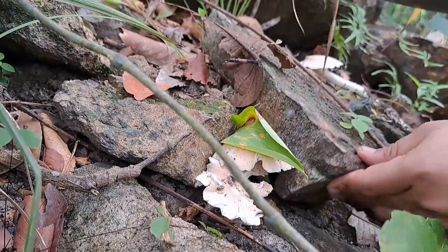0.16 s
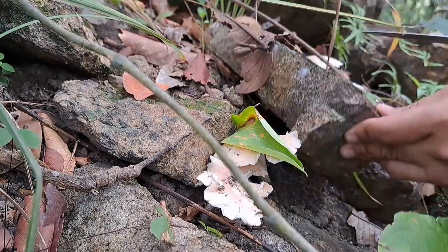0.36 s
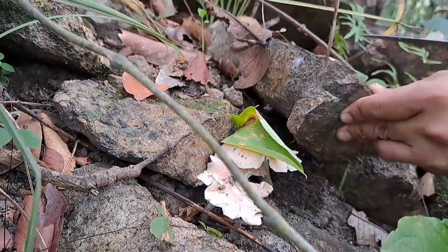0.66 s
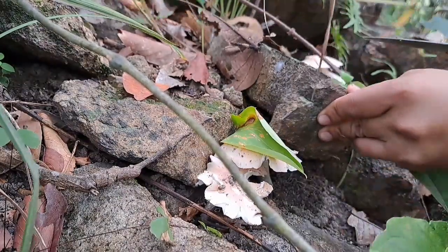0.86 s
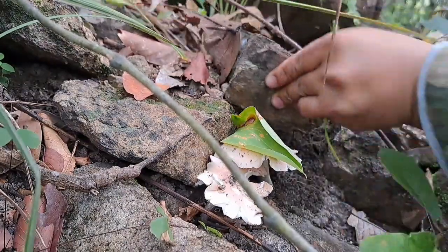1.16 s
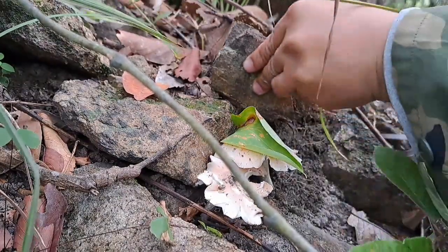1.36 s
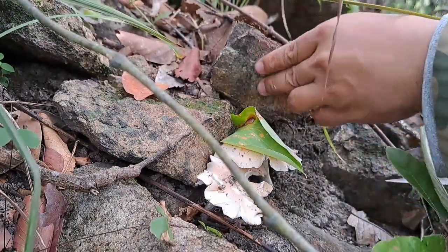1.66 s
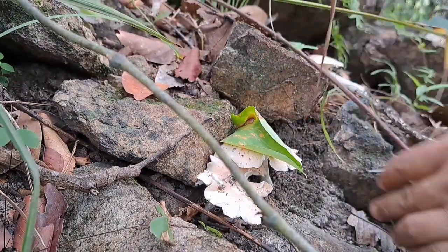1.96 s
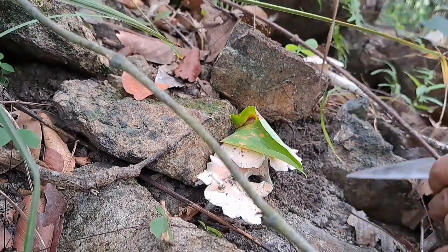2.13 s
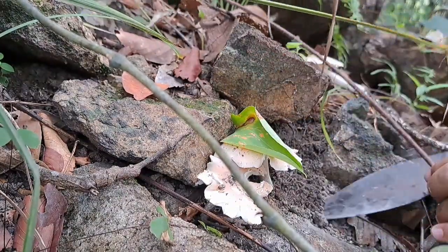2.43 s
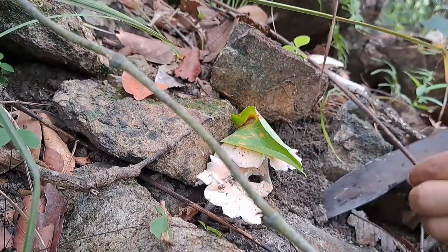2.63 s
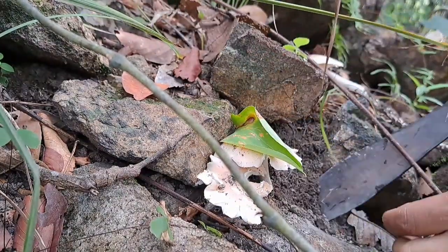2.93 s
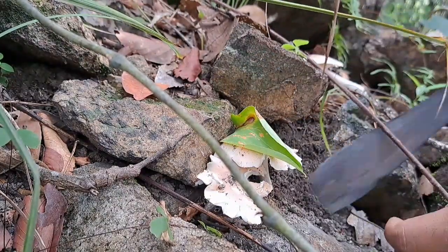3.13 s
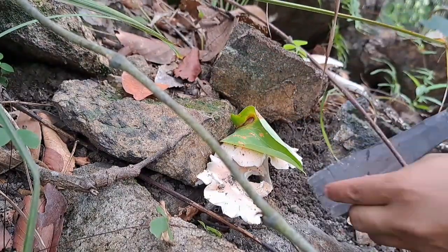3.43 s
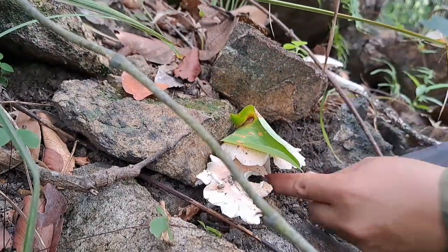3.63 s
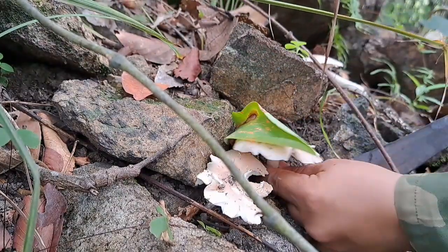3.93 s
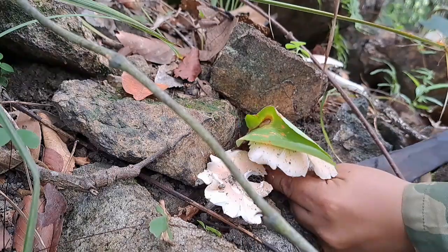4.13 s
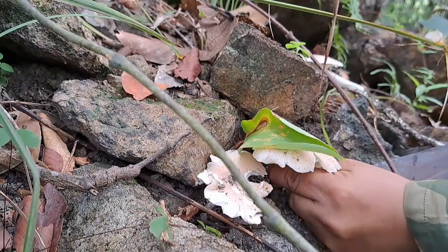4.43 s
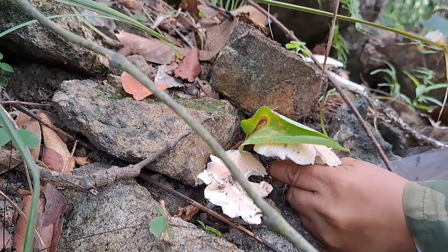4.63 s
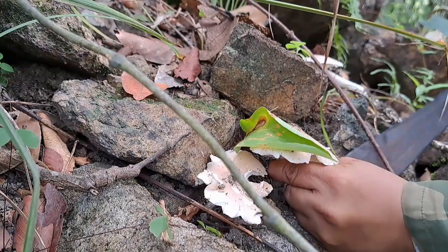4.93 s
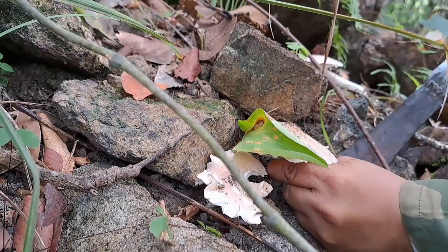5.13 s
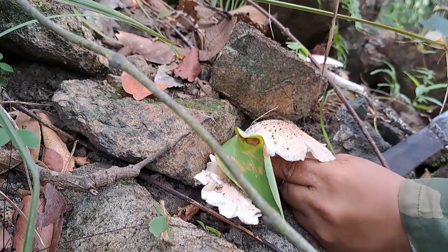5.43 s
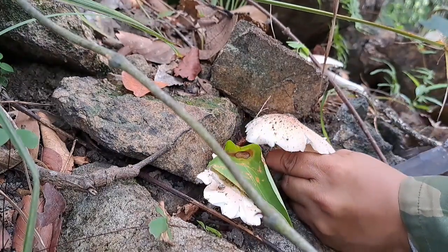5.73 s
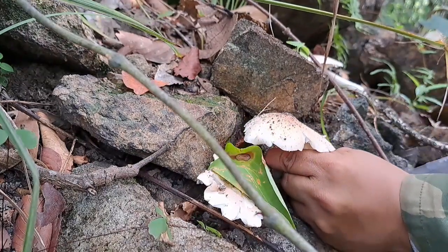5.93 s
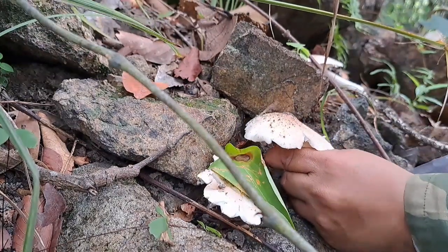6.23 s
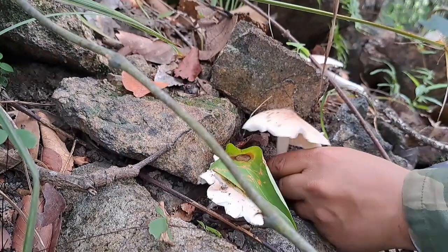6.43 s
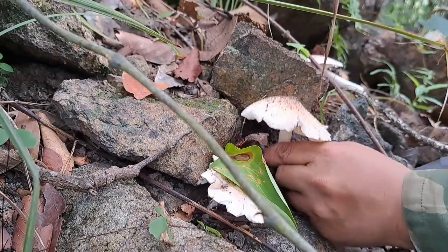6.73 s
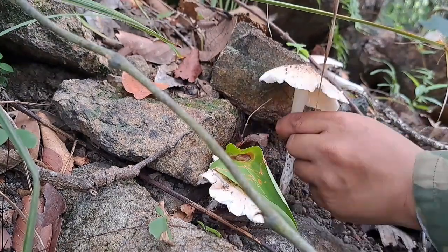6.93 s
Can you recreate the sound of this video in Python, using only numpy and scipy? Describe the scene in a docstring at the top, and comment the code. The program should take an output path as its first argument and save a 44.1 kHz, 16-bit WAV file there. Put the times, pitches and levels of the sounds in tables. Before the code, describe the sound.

A hand turns a stone over with faint gritty scrapes and a few low, hollow thuds. Then a long knife digs into stony soil in short, crackling strokes, with sharp clicks and brief steel ringing. The work eases into softer rustles of grit and leaves and a dull thud, before a last cluster of snaps as a mushroom is lifted. Everything is close and slightly right, in nearly silent woods.

```python
"""Digging in stony soil

Hands turn a stone over, then a long knife digs in forest soil close to the right of a phone.
Slipping grit and leaves rustle, and cracking grains click and make the steel blade ring.
The stone and the loose ground thud low when pushed. The woods behind are nearly silent."""
import sys
import numpy as np
from scipy import signal
from scipy.fft import rfft, irfft, next_fast_len
from scipy.io import wavfile
from scipy.ndimage import uniform_filter1d, map_coordinates

SR = 44100
rng = np.random.default_rng(int(sys.argv[2]) if len(sys.argv) > 2 else 0)


def persist_wave(psi):
    """Save psi, clipped to +-1, as 16-bit WAV."""
    counts = np.round(np.clip(psi, -1, 1) * 32767).astype(np.int16)
    wavfile.write(sys.argv[1], SR, np.atleast_2d(counts).T)


N = 312669

# Single grains and dry leaves cracking. Each row: start in seconds, treble level in dB, contact. Contact says
# what is touched: about -1 is soft soil, 0 is dry grit, 1 is bare steel.
CRACKS = [(.254, -51, 0.097), (.268, -51, .2), (.694, -56, .3), (0.605, -49.5, -0.15), (1.164, -47, 0.57),
          (1.194, -42, 0.35), (1.216, -35.5, -0.5), (1.29, -35, -0.47), (2.083, -27, -0.068),
          (2.106, -42, -0.98), (2.652, -27, -0.13), (2.771, -21.5, 0.6), (2.812, -30, 0.74),
          (2.852, -12, -0.15), (2.892, -17, 0.53), (2.993, -28, 0.51), (3.006, -29.5, 0.064),
          (3.073, -23.5, 0.82), (3.081, -30, 0.82), (3.107, -15, 0.86), (3.279, -32.5, -0.16),
          (3.322, -32.5, 0.44), (3.354, -35, -0.41), (3.43, -37.5, 0.0034), (3.504, -34, -0.24),
          (3.559, -15.5, 0.32), (3.953, -26.5, 0.34), (4.088, -25, 0.9), (4.113, -23, 0.67),
          (4.137, -33, 0.25), (4.147, -30, 0.095), (4.185, -39, 0.68), (4.273, -44, 0.1),
          (4.858, -33, -0.27), (4.892, -26, 0.023), (5.083, -22.5, -0.066), (5.186, -41, 0.79),
          (5.366, -41, .1), (5.401, -36.5, 0.011), (5.435, -49, .1), (5.508, -48, 0.7), (5.578, -53.5, 1),
          (5.839, -42.5, -0.075), (5.905, -42, -0.25), (5.94, -38, 0.082), (6.116, -44.5, -1.15),
          (6.144, -45.5, -0.28), (6.296, -46, 0.15), (6.349, -42.5, 0.34), (6.392, -51.5, -1.01),
          (6.419, -49.5, -0.44), (6.624, -45.5, -0.88), (6.653, -18.5, 0.11), (6.675, -24.5, 0.071),
          (6.736, -50, -1.1), (6.825, -20, -0.51), (6.864, -37, -0.3), (6.951, -35, 0.61),
          (7.003, -32, 0.57)]
STONE_TIPS_S, KNIFE_ARRIVES_S = 0.83, 1.9


def undb(db):
    """Turn decibels into a gain."""
    return 10 ** (np.asarray(db) / 20)


def unit(x):
    """Scale a sound to an average power of 1."""
    return x / np.sqrt(np.mean(x ** 2))


def curve(points):
    """Join (seconds, value) points with straight lines."""
    return np.interp(np.arange(N) / SR, *np.transpose(points))


def wander(rate):
    """Glide to a new random value `rate` times a second."""
    step = int(SR / rate)
    held = np.repeat(rng.standard_normal(N // step + 1), step)
    return unit(uniform_filter1d(held, step)[:N])


def colour(x, points):
    """Filter a sound to follow (Hz, dB) points."""
    size = 4096
    hz, db = np.transpose(points)
    freqs = np.arange(size // 2 + 1) * SR / size
    cepstrum = irfft(np.interp(np.log(freqs + 1), np.log(hz), db) * np.log(10) / 20)
    cepstrum[1:size // 2] *= 2  # folded so that nothing sounds before its cause
    cepstrum[size // 2 + 1:] = 0
    return signal.fftconvolve(x, irfft(np.exp(rfft(cepstrum))))[:N]


def ring(x, hz, t60):
    """One ringing tone that fades 60 dB in t60 seconds."""
    decay, angle = np.exp(-np.log(1000) / (t60 * SR)), 2 * np.pi * hz / SR
    return signal.lfilter([np.sin(angle)], [1, -2 * decay * np.cos(angle), decay ** 2], x)


def played(tone, x, gain):
    """Shake the filter `tone` with x, as loudly as `gain` says."""
    return tone(x * gain) / np.sqrt(np.mean(tone(x) ** 2))


def quiet_woods():
    """Faint air and microphone hiss, different in each ear."""
    # Each row: frequency in Hz, relative level in dB.
    air_tone = [(15, -40), (25, -11), (154, -2), (399, -24.5), (3510, -28), (7920, -17), (15200, -24.5),
                (16500, -44)]
    return unit(np.array([colour(rng.standard_normal(N), air_tone) for _ in range(2)])) * undb(-71)


def grains(rate, spread_db, fill):
    """Slipping grit: clicks of very uneven size over a hiss of fine sand."""
    hit = rng.random(N) < rate / SR
    size = undb(spread_db * np.minimum(rng.exponential(size=N), 4.0)) * rng.standard_normal(N)
    return unit(unit(hit * size) + fill * rng.standard_normal(N))


def patchy(x, drift):
    """Grain sizes keep changing, so each frequency band swells and sinks on its own."""
    size = next_fast_len(N)
    spectrum = rfft(x, size)
    edges = np.geomspace(300, SR / 2, len(drift) + 1)
    hz = np.arange(len(spectrum)) * SR / size
    bands = (irfft(spectrum * (hz >= lo) * (hz < hi), size)[:N] for lo, hi in zip(edges, edges[1:]))
    return unit(sum(band * gain for band, gain in zip(bands, drift)))


def strokes_and_cracks():
    """Loudness of grit, soil and steel over time: soft contact sounds the soil, hard contact the steel."""
    # Loose soil trickling. Each row: time in seconds, treble level in dB.
    trickle = [(0, -59.5), (.2, -76.5), (1.4, -96), (1.5, -75), (1.8, -82.5), (2.05, -55.5), (2.5, -78.5),
               (2.72, -59.5), (3.45, -69), (3.9, -71), (4.3, -63.5), (4.65, -82.5), (5.2, -57), (5.83, -97),
               (6.05, -70), (6.58, -73.5), (6.72, -51), (7.09, -58)]
    # Strokes of hand, stone and blade. Each row: start and length in seconds, treble level in dB,
    # contact, build (0 strikes and dies away, 1 swells and stops dead).
    strokes = [(0.249, 0.081, -52, -0.28, 0.28), (0.409, 0.097, -54, -0.072, 0.33),
               (0.694, 0.17, -48.5, -0.5, 0.44), (0.994, 0.209, -44, 0.22, 0.77),
               (1.194, .07, -42, -0.0079, 0.21), (1.274, 0.11, -49.5, -0.5, 0.65),
               (2.08, 0.029, -44, -0.37, 0.079), (2.149, 0.074, -56, -0.2, 0.12),
               (2.303, 0.094, -52.5, 0.46, 0.43), (2.559, 0.047, -33.5, 0.71, 0.39),
               (2.629, 0.02, -33.5, -0.38, 0.24), (2.763, 0.055, -34, 0.61, 0.62),
               (2.85, 0.043, -21, -0.051, 0.24), (2.882, 0.02, -26, .3, .2),
               (2.956, 0.088, -42, 0.12, 0.18), (3.069, 0.061, -39.5, 1.24, .15),
               (3.106, 0.012, -28.5, 1.05, 0.046), (3.173, 0.029, -15, 0.46, 0.43),
               (3.203, 0.035, -27, -0.014, 0.57), (3.307, 0.12, -41, 0.29, 0.59),
               (3.522, 0.059, -35, 0.16, 1), (3.576, .11, -42, -0.074, 0.15),
               (3.761, 0.064, -41.5, 0.37, 0.047), (3.94, 0.025, -42, 0.89, 0.59),
               (4.077, 0.085, -41, 0.75, 0.36), (4.174, 0.051, -51, 0.56, .1),
               (4.23, 0.16, -58.5, 0.8, 0.12), (4.832, 0.056, -36.5, 0.89, 0.66),
               (4.947, 0.088, -40, 0.85, 0.76), (5.079, 0.048, -30, 0.16, 0.44),
               (5.3, 0.04, -29.5, -0.059, 0.42), (5.37, .1, -49, 0.23, 0.24), (5.506, 0.36, -55, .05, 0.59),
               (5.683, 0.091, -52.5, -1.01, 0.9), (5.896, 0.067, -45.5, -0.83, 0.61),
               (6.252, 0.068, -47.5, -0.18, 0.2), (6.379, 0.083, -57, -0.76, 0.2),
               (6.652, 0.032, -35, -0.38, 0.32), (6.766, 0.032, -27.5, 0.43, 0.32),
               (6.821, .022, -21.5, -0.16, 0.41), (6.85, 0.03, -42.5, -0.55, 0.2),
               (6.965, 0.04, -41, 0.96, 0.24)]
    t = np.arange(N) / SR
    power = undb(curve(trickle) + 2.0 * wander(23) + np.array([[0], [-9], [-20]])) ** 2
    uneven_db = 2.0 * wander(90)
    for start, length, db, contact, build in strokes:
        rise, fall = 0.87 * length * np.clip([build, 1 - build], .03, 1)  # seconds per 12 dB
        span = slice(max(int((start - 3 * rise) * SR), 0), int((start + length + 3 * fall) * SR))
        early = np.maximum((start - t[span]) / rise + .5, 0)
        late = np.maximum((t[span] - start - length) / fall + .5, 0)
        levels = db + np.array([[0], [-9.5 - 13 * contact], [-16 + 20 * contact]])
        power[:, span] += undb(levels - 12 * (early + late) + uneven_db[span]) ** 2
    age = t[:SR // 20]
    crack = (1 - np.exp(-age / 0.00054)) * undb(-60 * age / 0.021)
    for start, db, contact in CRACKS:
        i = int(start * SR)
        levels = db + np.array([[0], [-13 - 26 * contact], [-15 + 22.5 * contact]])
        power[:, i:i + len(age)] += (crack / crack.max() * undb(levels)) ** 2
    # small grains crack at random on top of whatever moves
    ticks = (rng.random(N) < 80 / SR) * undb(11 + 3.5 * rng.standard_normal(N)) ** 2
    power[0] += np.minimum(power[0], undb(-52) ** 2) * signal.fftconvolve(ticks, crack ** 4)[:N]
    # what the blade takes up is not heard as dry crackle
    power[0] *= power[0] / (power[0] + power[2])
    return np.sqrt(np.abs(power))


def stone_ring(x):
    """The dragged stone rings hollow."""
    # Each row: pitch in Hz, level in dB, ring time in seconds.
    stone_tones = [(480, 0, .05), (3230, -5, .025), (5700, -5, .018)]
    return sum(undb(db) * ring(x, hz, t60) for hz, db, t60 in stone_tones)


def ground_rumble(shake):
    """The loose ground answers every push with a low rumble."""
    band = signal.butter(2, [46, 78], "bandpass", fs=SR, output="sos")
    push = uniform_filter1d(shake, 1500) ** 0.62 + undb(-63.0)
    return played(lambda x: signal.sosfilt(band, x), rng.standard_normal(N), undb(-29) * push)


def rocking_thuds():
    """A rough push rocks the stone unevenly; its pitch sags and two hollow overtones knock along."""
    # Each row: start in seconds, level in dB, length of the push in seconds.
    pushes = [(0.721, -39, 0.022), (0.744, -28, 0.03), (.8, -45, 0.081), (.86, -38.5, 0.019),
              (0.907, -35, 0.0051), (1.223, -37.5, 0.048), (1.318, -37, 0.082), (3.18, -47, 0.009),
              (3.95, -41.5, 0.01), (4.895, -44, 0.018), (5.335, -42.5, 0.022), (5.698, -25, 0.022),
              (6.82, -46, 0.029)]
    rock_hz, sag_per_s, ring_s = 143.4, 1.45, 0.12
    out = np.zeros(N)
    t = np.arange(SR // 4) / SR
    wobble, rough = wander(70), wander(110)
    for (start, db, length), phase in zip(pushes, rng.random((len(pushes), 3))):
        span = slice(int(start * SR), int(start * SR) + len(t))
        fade = np.minimum(t / 0.0056, 1) * undb(db - 60 * np.maximum(t - length, 0) / ring_s)
        cycles = np.cumsum(rock_hz * (1 - sag_per_s * t + 0.083 * wobble[span])) / SR
        rock = undb(3.3 * rough[span]) * np.sin(2 * np.pi * (cycles + phase[0]))
        knock = undb(-4) * np.sin(2 * np.pi * (250 * t + phase[1]))
        knock += undb(-8) * np.sin(2 * np.pi * (450 * t + phase[2]))
        out[span] += fade * (rock + knock * undb(3.7 * wobble[span] - 380 * t))
    return out


def blade_ring(x, shift):
    """Moving contact feeds the steel's tones unevenly; soil around it shortens them and alters their mix."""
    # Each row: pitch in Hz, level in dB, change in dB when buried, free ring time in seconds.
    steel_tones = [(1034, -11, -8, 0.045), (1670, -5, -4, 0.03), (2890, -1, 3, .045), (3863, -5, -3, .04),
                   (4340, 0, 1, 0.035), (4980, 2, -5, 0.03), (5400, -2, -3, 0.025), (6180, -6, 0, .035),
                   (7220, -9, 6, .045), (7600, -3, -4, 0.045), (7860, -7, 4, 0.045), (8650, -6, -1, .035),
                   (10900, -4, -1, 0.03), (12700, -8, 6, 0.035), (13410, 1, -12, 0.09), (15000, -7, 2, .04)]
    # Contact near the thin tip favours high tones. Each row: time in seconds, tilt in dB per octave.
    tip_contact = [(2.65, 3), (2.8, 0), (6.85, 0), (6.95, 2.5)]
    t = np.arange(N) / SR
    buried = (t > 3.35) & (t < 6.9)
    tilt = curve(tip_contact)
    out = np.zeros(N)
    for k, (hz, db, buried_db, t60) in enumerate(steel_tones):
        gain = undb(db + tilt * np.log2(hz / 4000)) * np.roll(shift, k * N // len(steel_tones))
        push = (-1) ** k * gain * x
        out += ring(push * ~buried, hz, t60)
        out += ring(push * buried * undb(buried_db), hz, t60 * 0.82)
    return out


def digging(apart):
    """Grit crackles and rings the blade, clods sound the soil; `apart` is the far side's own grit share."""
    # The tone of grit and of soil. Each row: frequency in Hz, relative level in dB.
    grit_tone = [(400, -17.5), (900, 0.5), (1700, 2.5), (2800, -1.5), (4400, 5), (6500, 0.5), (8000, -0.5),
                 (12000, -5), (16500, -3)]
    soil_tone = [(40, -49), (130, -0.5), (250, 0), (600, -1.5), (1100, -7), (1800, -9.5), (4000, -39)]
    grit_gain, soil_gain, steel_gain = strokes_and_cracks()
    grit, other = (grains(4000, spread_db=3.0, fill=0.6) for _ in range(2))
    drift = [undb(2.8 * wander(55)) for _ in range(12)]
    grit, other = patchy(grit, drift), patchy(other, drift)
    clods = grains(1500, spread_db=6.0, fill=1.33)
    snap = np.zeros(N)  # every crack opens with one sharp break
    snap[(np.array(CRACKS)[:, 0] * SR).astype(int) + SR // 1000] = 1
    soil = played(lambda x: colour(x, soil_tone), clods + 4.0 * snap, soil_gain)
    dragged = np.arange(N) < STONE_TIPS_S * SR
    stone = undb(-2) * played(stone_ring, clods, soil_gain * dragged)
    steel_gain *= np.arange(N) > KNIFE_ARRIVES_S * SR
    shift = undb(3.0 * wander(40))
    far_grit = np.sqrt(1 - apart) * grit + np.sqrt(apart) * other
    sides = []
    for drive in (far_grit + 2.0 * snap, grit + 9.1 * snap):
        crackle = played(lambda x: colour(x, grit_tone), drive, grit_gain)
        steel = played(lambda x: blade_ring(x, shift), drive, steel_gain)
        sides.append(crackle + steel + soil + stone)
    return sides, soil_gain


def far_microphone(x):
    """The further right the work, the later and duller it reaches the left microphone."""
    # Each row: time in seconds, direction of the work (0 ahead, 1 right).
    direction = [(0, .5), (1.45, 0), (1.9, 1), (7.09, 1)]
    # The sound shadow on the left. Each row: frequency in Hz, gain in dB.
    shadow = [(60, -1), (600, -2), (1200, -7), (2400, -5), (4400, -13), (8000, -4), (15000, -6)]
    side = curve(direction)
    shade = np.clip(side, .3, 1)
    dulled = shade * colour(x, shadow) + (1 - shade) * x
    return map_coordinates(dulled, [np.arange(N) - 12 * side], order=3)  # up to 12 samples late


def stone_echoes(x, t60):
    """Nearby stones send a different short smear of echoes to each microphone."""
    t = np.arange(int(t60 * SR)) / SR
    tails = rng.standard_normal((2, len(t))) * undb(-60 * t / t60)
    return np.array([signal.fftconvolve(x, tail / np.linalg.norm(tail))[:N] for tail in tails])


def scene():
    """Mix the digging, its low thuds and the quiet woods in stereo."""
    (far, right), soil_gain = digging(apart=.7)
    thud = rocking_thuds()
    direct = undb(3) * np.array([far_microphone(far), right])
    echoes = undb(-12) * stone_echoes(right, t60=.02)
    rumble = ground_rumble(soil_gain + 0.22 * np.abs(thud))
    low = thud * undb([[-.6], [.6]]) + rumble * undb([[-1.2], [1.2]])
    return direct + echoes + low + quiet_woods()


def record(dry):
    """The phone rounds the loudest peaks and steeply cuts the highest treble."""
    treble_cut = signal.ellip(12, .2, 100, 15900, fs=SR, output="sos")
    return signal.sosfilt(treble_cut, .9 * np.tanh(dry / .9))


dry = scene()
out = record(dry)
persist_wave(out)
```